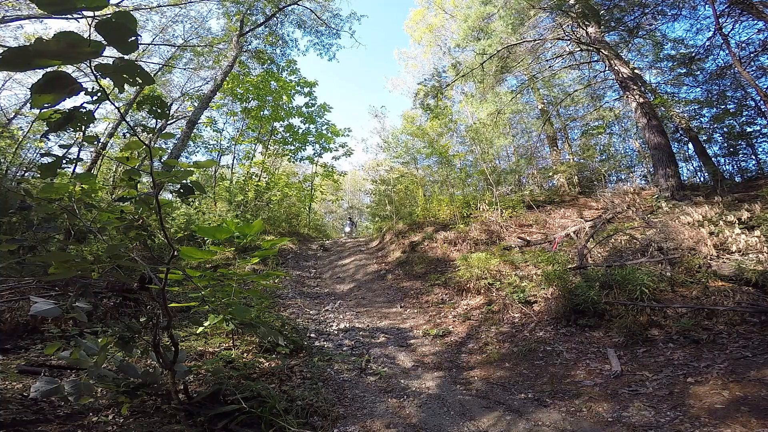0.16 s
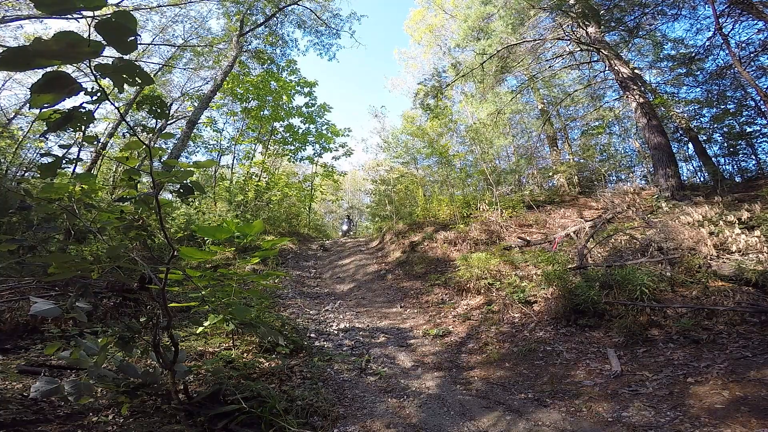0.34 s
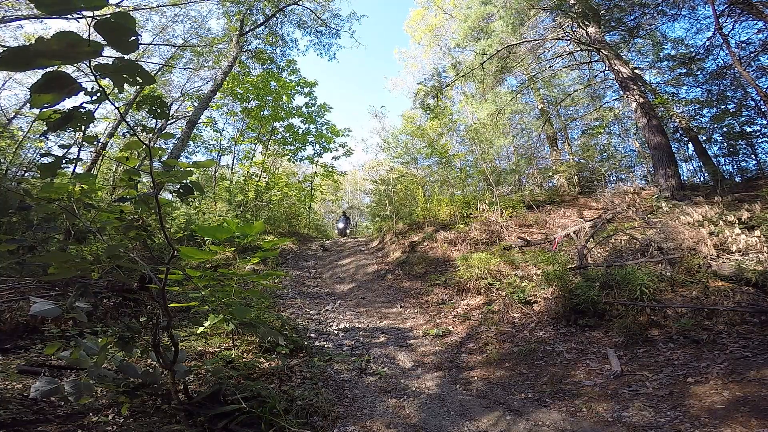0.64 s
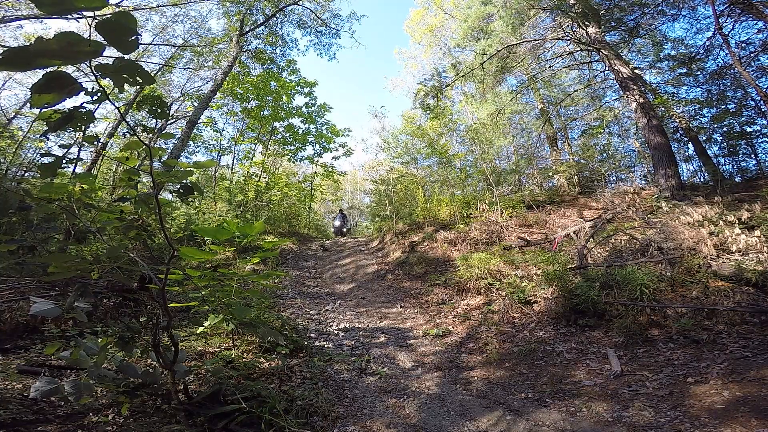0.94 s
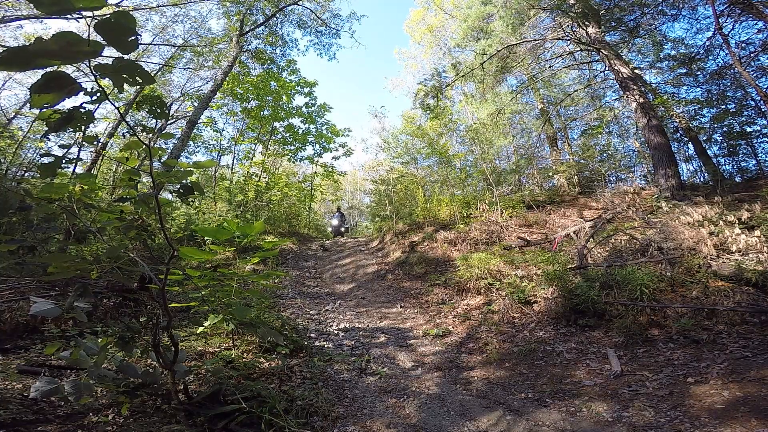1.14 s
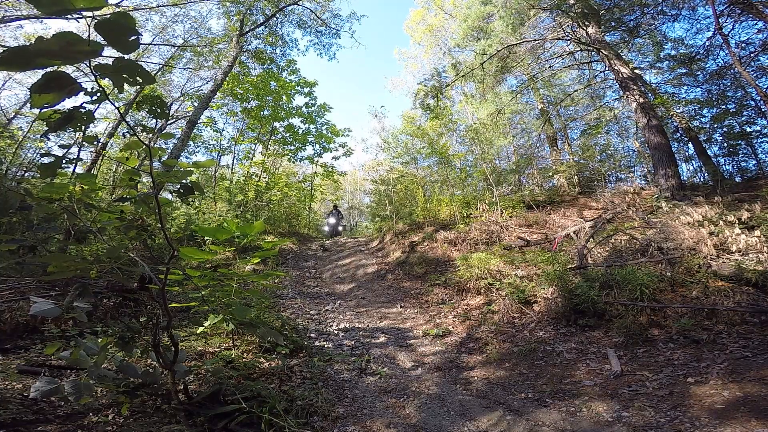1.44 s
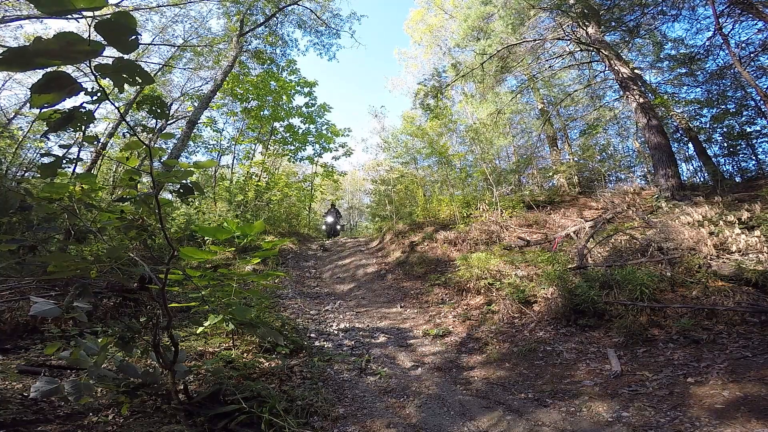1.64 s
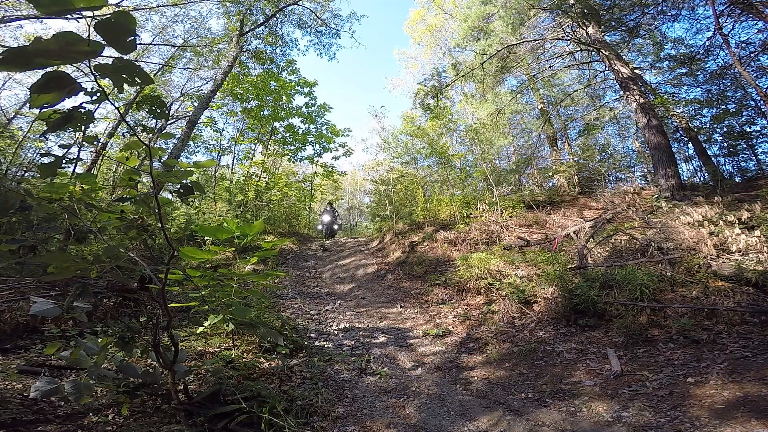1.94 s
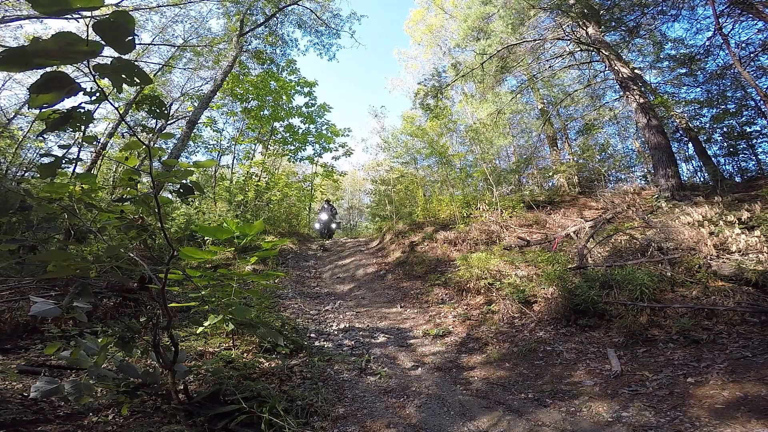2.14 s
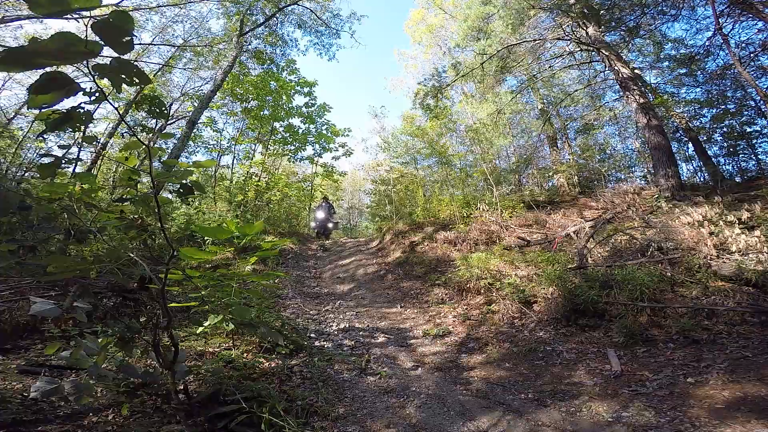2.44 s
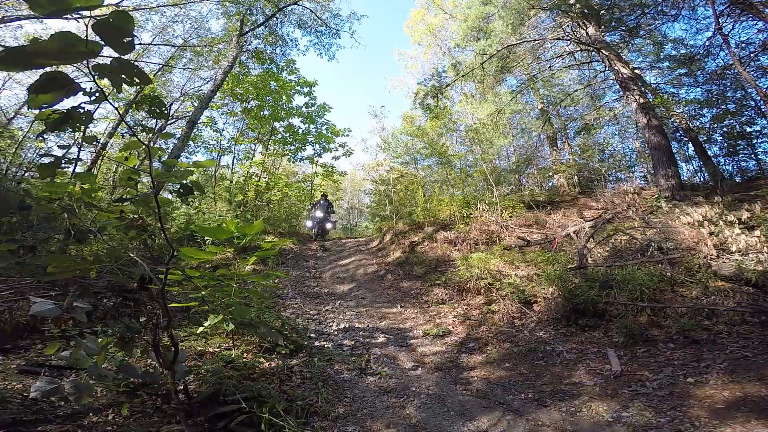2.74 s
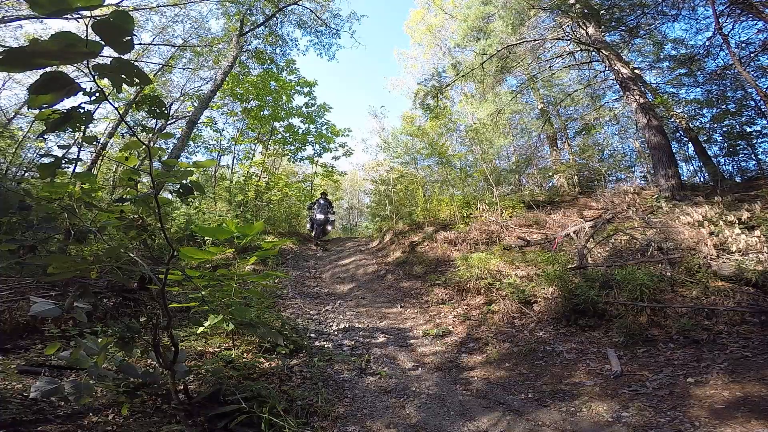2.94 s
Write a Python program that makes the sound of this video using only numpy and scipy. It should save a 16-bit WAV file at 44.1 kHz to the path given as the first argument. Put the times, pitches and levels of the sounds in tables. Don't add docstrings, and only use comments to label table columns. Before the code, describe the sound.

Single-cylinder trail motorcycle chugs up a wooded dirt path, growing louder, with a sharp stone clack

```python
import sys
import numpy as np
from scipy import signal
from scipy.fft import rfft, irfft, next_fast_len
from scipy.io import wavfile
from scipy.ndimage import uniform_filter1d

SR = 44100
rng = np.random.default_rng(int(sys.argv[2]) if len(sys.argv) > 2 else 0)


def elevation(decibels):
    levels = np.asarray(decibels, float)
    return 10 ** (levels / 20)


def digitize_waveform(pressure):
    field = np.atleast_2d(pressure).T
    bounded = np.clip(field, -1, 1)
    quanta = np.round(bounded * 32767).astype(np.int16)
    wavfile.write(sys.argv[1], SR, quanta)


N = 136710

# (time [s], throttle load [dB], nearness [dB], intake [dB], exhaust push [dB])
RIDER = [(0, -5.5, 1, 2.5, 2), (.3, -6, -1, 2, -4), (.5, 1, -1.5, 0.5, 1.5), (.9, 1.5, 0, 3, 2),
         (1.3, 1.5, 1.5, 4, 0.5), (1.8, 2, 4, 4, 0.5), (2.15, 0, 6, 1, 2.5), (2.3, 1, 5.5, 7.5, 7.5),
         (2.6, -4, 7.5, 6.5, 9.5), (2.8, -3, 8, 7.5, 6.5), (2.95, -0.5, 8, 9.5, 7), (3.1, 4, 8.5, 2, -3)]


def evened(x):
    return x / np.sqrt(np.mean(x ** 2) + 1e-20)


def read(points, hz, index=1):
    rows = np.array(points, float)
    return np.interp(np.log(hz + 1), np.log(rows[:, 0] + 1), rows[:, index])


def curve(points, t, index=1):
    rows = np.array(points, float)
    return np.interp(t, rows[:, 0], rows[:, index])


def coloured(x, spectrum):
    hz = np.fft.rfftfreq(x.shape[-1], 1 / SR)
    return irfft(rfft(x) * elevation(read(spectrum, hz)), x.shape[-1])


def add(mix, s, sound):
    at = max(round(s * SR), 0)
    part = mix[..., at:at + sound.shape[-1]]
    part += sound[..., :part.shape[-1]]


def strokes(turns, turn, db, spread_db):
    jitter_s = 0.00012
    at = np.flatnonzero(np.diff(np.floor(turns - turn)) > 0)
    chance = rng.standard_normal((len(at), 2))
    moved = at + np.round(jitter_s * SR * chance[:, 0]).astype(int)
    out = np.zeros(N)
    out[np.clip(moved, 0, N - 1)] = elevation(db[at] + spread_db * chance[:, 1])
    return out


def woodland_air():
    # (frequency [Hz], density [dB per Hz])
    air_spectrum = [(200, -45), (1000, -7.5), (4000, 6.5), (8000, 0), (10500, -8), (11500, -14),
                    (14700, -18)]
    return elevation(-51.5) * evened(coloured(rng.standard_normal((2, N)), air_spectrum))


def gravel():
    # (start [s], length [s], level [dB], centre [Hz])
    scrapes = [
        (1.746, 0.087, -45.5, 523),
        (2.26, 0.075, -41, 2800),
        (2.499, 0.36, -51, 1700),
        (2.619, .1, -45.5, 420),
        (2.902, 0.29, -39.5, 410),
        (2.92, 0.34, -50, 383),
        (2.95, .24, -41.5, 800),
        (2.954, 0.047, -37, 1500),
        (2.873, 0.038, -50, 800),
    ]
    out = np.zeros((2, N))
    for s, length, db, hz in scrapes:
        u = np.arange(0, 1, 1 / (length * SR))[:15000]
        lumps = elevation(2.5 * evened(uniform_filter1d(rng.standard_normal(15000), 250)))
        noise = rng.standard_normal((2, 15000)) * lumps
        band = signal.filtfilt(*signal.iirpeak(hz, 1.2, SR), noise)
        add(out, s, elevation(db) * evened(band)[:, :len(u)] * np.sin(np.pi * u ** .6))
    return out


def knocks():
    decay_s, q, gain_db = 0.0016, 2.1, 0.5
    # (time [s], peak level [dB], pitch [Hz])
    impacts = [(0.196, -32, 1190), (1.94, -25.5, 2030), (1.993, -36, 5130), (2.011, -40, 6100),
               (2.044, -32, 2380), (2.059, -25.5, 4710), (2.087, -29.5, 1700), (2.102, -25, 4110),
               (2.271, -29, 3700), (2.536, -29, 1540), (2.749, -29, 696), (2.884, -30, 3600),
               (2.966, -24.5, 1350), (2.981, -36, 1300), (3.028, -20.5, 4240), (3.033, -16, 4480),
               (3.069, -26.5, 1200)]
    out, u = np.zeros((2, N)), np.arange(700) / SR
    for s, db, hz in impacts:
        burst = rng.standard_normal((2, 700)) * np.exp(-u / decay_s)
        for _ in range(2):
            burst = signal.lfilter(*signal.iirpeak(hz, q, SR), burst)
        add(out, s, elevation(db + gain_db) * burst / abs(burst).max())
    return out


def frame_clack():
    start_s, lag_s, crack_s, spray_t60 = 1.9905, .0035, 0.0019, .45
    # (frequency [Hz], density [dB per Hz])
    clack_spectrum = [(470, -47), (800, -14), (2370, -18.5), (3130, -18), (3900, -8.5), (5290, -6.5),
                      (8410, -13.5), (13500, -30.5), (14700, -36)]
    # (frequency [Hz], level [dB], 60 dB decay time [s])
    frame_modes = [(3970, -26.5, 0.035), (5300, -31, 0.036), (6190, -32, 0.063)]
    out, u = np.zeros((2, N)), np.arange(16000) / SR
    late = u > lag_s
    grains = elevation(1.7 * evened(uniform_filter1d(rng.standard_normal(16000), 60)))
    first_touch = ~late * elevation(-21)
    crack = late * np.exp(-(u - lag_s) / crack_s)
    spray = elevation(-5.5 - 60 * u / spray_t60) * grains
    noise = evened(coloured(rng.standard_normal((2, 16000)), clack_spectrum))
    add(out, start_s, elevation(-26.5) * noise * (crack + first_touch + spray))
    ring = sum(elevation(db - 60 * u / t60) * np.sin(2 * np.pi * hz * u) for hz, db, t60 in frame_modes)
    add(out[0], start_s + lag_s, ring)
    return out


def machine_hiss(turns):
    patch_db, gate = 1, 0.13
    # (frequency [Hz], density [dB per Hz])
    rattle_spectrum = [(150, -15), (250, -6.5), (700, -8.5), (1730, -10), (2050, -12.5), (2330, -10.5),
                       (5840, -15), (10000, -36.5), (11000, -42), (14300, -42), (22000, -120)]
    hz, _, z = signal.stft(rng.standard_normal((2, N)), SR, nperseg=512)
    patches = uniform_filter1d(rng.standard_normal(z.shape[1:]), 6, 0)
    patches = evened(uniform_filter1d(patches, 5, 1))
    z = z * elevation(read(rattle_spectrum, hz)[:, None] + patch_db * patches)
    hiss = signal.istft(z, SR, nperseg=512)[1][:, :N]
    twice = np.cos(4 * np.pi * (turns + 0.03))
    once = np.cos(2 * np.pi * (turns - .45))
    return elevation(-47) * (1 + gate * (twice + .5 * once)) * evened(hiss)


def grit():
    grains_per_s = 500
    out, u = np.zeros((2, N)), np.arange(500) / SR
    for hz in np.geomspace(500, 6500, 14):
        size = elevation(4.06 * np.minimum(rng.exponential(1, (2, N)), 4))
        size *= rng.random((2, N)) < grains_per_s / 14 / SR
        grain = np.sin(2 * np.pi * hz * u) * u * hz * np.exp(-u * hz / 0.53)
        out += signal.oaconvolve(size, grain[None] * np.sqrt(hz), axes=1)[:, :N]
    return elevation(-56) * evened(out)


def ground_rumble():
    band = signal.butter(2, [40, 180], "band", fs=SR, output="sos")
    return elevation(-47) * evened(signal.sosfilt(band, rng.standard_normal((2, N))))


def valve_tick(t, turns):
    tick_hz, rise_s, buzz_s = 2380, .0025, .015
    # (time [s], level [dB])
    tick_level = [(0, -14), (.45, -11), (.65, -2), (1.2, -1), (1.5, -1), (1.8, 6), (2.1, 0), (2.4, -2),
                  (3.1, -6)]
    u = np.arange(6000) / SR
    taps = strokes(turns, 0.51, -42.5 + curve(tick_level, t), 1.3)
    ring = u / rise_s * np.exp(1 - u / rise_s) * np.sin(2 * np.pi * tick_hz * u)
    chatter = evened(signal.lfilter(*signal.iirpeak(tick_hz, 8, SR), rng.standard_normal(N)))
    buzz = signal.oaconvolve(taps, np.exp(-u / buzz_s))[:N] * chatter
    return signal.oaconvolve(taps, ring)[:N] + elevation(-12) * buzz


def intake_thump(t, turns):
    width_s, dip = .0016, 0.097
    w = (np.arange(6000) / SR - .02) / width_s
    thump = np.exp(-w ** 2 / 2)
    thump -= dip * np.exp(-(w + 2) ** 2 / 2)
    thump -= dip * np.exp(-((w - 3) / 2.46) ** 2 / 2)
    suck = strokes(turns, 0.568, -24 + curve(RIDER, t, index=3), 1.1)
    return signal.oaconvolve(suck, thump)[882:882 + N]


def combustion_db(t):
    # (time [s], change [dB])
    weak = [
        (.05, -36),
        (.138, -31),
        (.31, 2),
        (.39, -3),
        (.658, -0.5),
        (.946, -6),
        (1.528, -3),
        (2.809, -13),
    ]
    # (time [s], gain [dB])
    pops = [
        (.002, 3.5),
        (.078, 6.5),
        (.273, 0.5),
        (.349, 4.5),
    ]
    return sum(db * (abs(t - s) < .013) for s, db in [*weak, *pops])


def exhaust_blow(t, turns, near_db, luck_db):
    blow_hz, rise_s, lead_s, glide = 103.7, 0.002, 0.0054, 0.33
    ring_db, ring_hz, ring_t60, silencer_hz = -1.5, 116.6, 0.17, 260
    u = np.arange(6000) / SR
    v = u / rise_s
    bend_s = glide * rise_s * (np.exp(-v) - np.exp(-lead_s / rise_s))
    blow = -1.85 * v ** 2 * np.exp(-v) * np.cos(2 * np.pi * blow_hz * (u - lead_s - bend_s))
    ring = elevation(ring_db - 60 * u / ring_t60) * (1 - np.exp(-v ** 2 / 2))
    blow -= ring * np.cos(2 * np.pi * ring_hz * (u - lead_s))
    fire = strokes(turns, 0, -27.5 + near_db + curve(RIDER, t) + luck_db, .7)
    lead = round(lead_s * SR)
    out = signal.oaconvolve(fire, blow)[lead:lead + N]
    return signal.filtfilt(*signal.butter(3, silencer_hz, fs=SR), out)


def exhaust_push(t, turns, luck_db):
    width_s, lag_s = 0.004, 0.0045
    p = (np.arange(6000) / SR - .02 - lag_s) / width_s
    level_db = -25.5 + curve(RIDER, t, index=4) + np.minimum(luck_db, 0)
    push = strokes(turns, 0, level_db, .7)
    return signal.oaconvolve(push, np.exp(-p ** 2 / 2))[882:882 + N]


def engine(t, turns, near_db):
    luck_db = combustion_db(t)
    exhaust = exhaust_blow(t, turns, near_db, luck_db) + exhaust_push(t, turns, luck_db)
    return exhaust + intake_thump(t, turns) + valve_tick(t, turns)


def scene():
    # (time [s], rate [cycles per s])
    engine_speed = [(0, 40.83), (.15, 31.62), (.35, 24.77), (.55, 21.74), (.85, 20.5), (1.0, 21.59),
                    (1.15, 20.4), (1.4, 20.25), (1.55, 20.32), (1.8, 20.33), (2.12, 20.07), (2.2, 21.69),
                    (2.4, 23.06), (2.7, 25.02), (2.8, 23.79), (2.9, 21.33), (3.0, 20.03), (3.1, 18.68)]
    t = np.arange(N) / SR
    turns = -2.05 + np.cumsum(curve(engine_speed, t)) / SR
    near_db = curve(RIDER, t, index=2)
    mix = woodland_air() + gravel() + knocks() + frame_clack()
    mix += elevation(near_db) * (machine_hiss(turns) + grit() + ground_rumble())
    mix[0] += engine(t, turns, near_db)
    return mix


def low_pass(x):
    return signal.sosfilt(signal.butter(12, 14890, fs=SR, output="sos"), x)


def record(dry):
    low_cut_hz = 28
    # (frequency [Hz], left lead [rad], left over right [dB], likeness [0-1])
    port_pair = [(30, -0.5, 3.3, .999), (126, 0.51, 1.5, 0.98), (310, 0, 6.5, 0.82), (639, 2.5, 5.5, 0.67),
                 (1286, 5, -1, 0.57), (2750, 5, 1.5, 0.88), (5400, 7, 3, 0.75), (9400, 8, -2, 1)]
    size = next_fast_len(N + 8192)
    hz = np.fft.rfftfreq(size, 1 / SR)
    shared, other = rfft(np.pad(dry, ((0, 0), (0, size - N)), "linear_ramp"))
    same = np.clip(read(port_pair, hz, index=3), 0, 1)
    turn = np.exp(.5j * read(port_pair, hz)) * elevation(read(port_pair, hz, index=2) / 2)
    left = shared * turn
    right = (same * shared + np.sqrt(1 - same ** 2) * other) / turn
    cut = hz ** 3 / (hz ** 3 + low_cut_hz ** 3)
    ports = irfft(cut * np.array([left, right]), size)
    return low_pass(ports[:, :N])


dry = scene()
out = record(dry)
digitize_waveform(out)
```